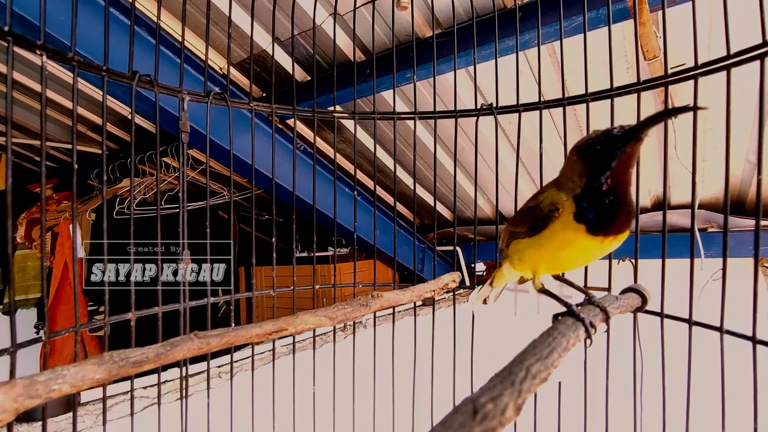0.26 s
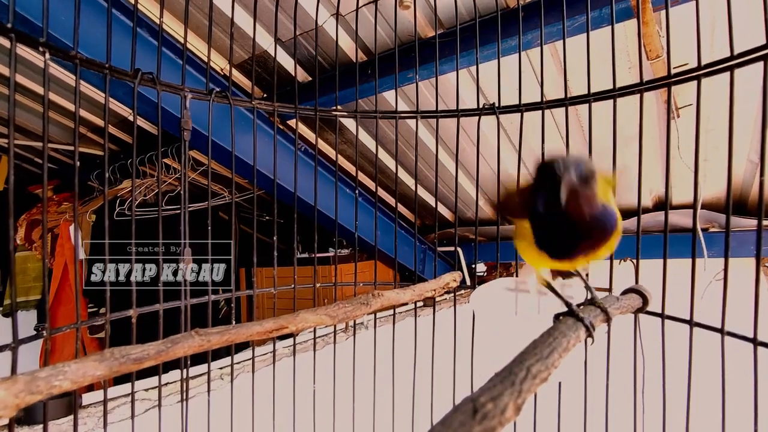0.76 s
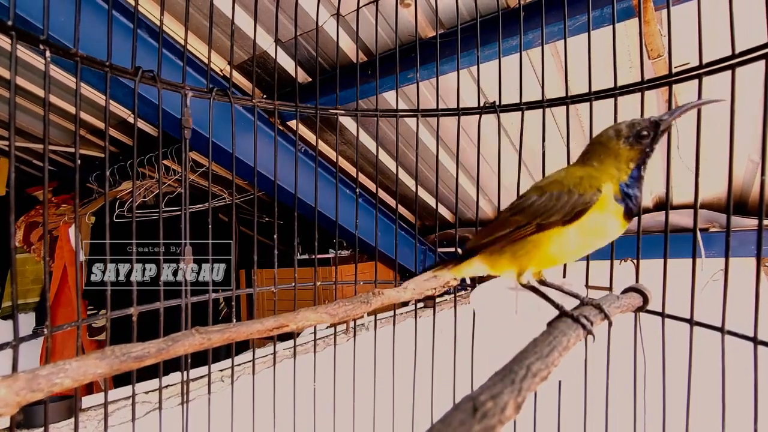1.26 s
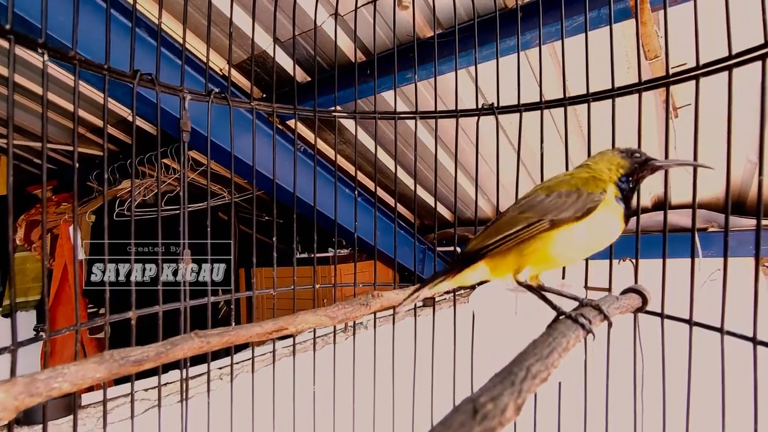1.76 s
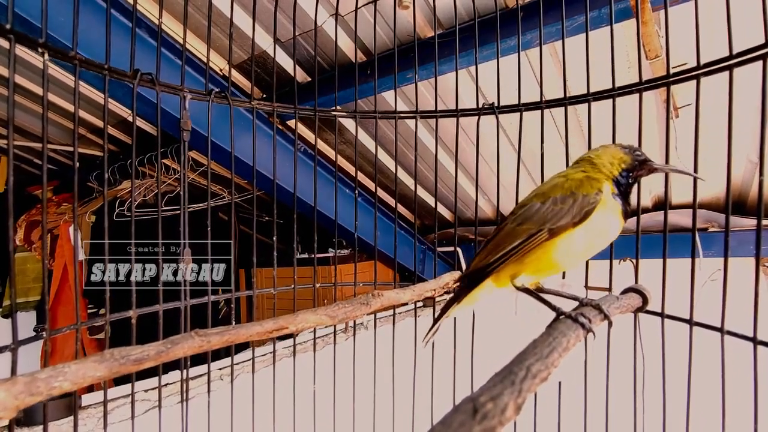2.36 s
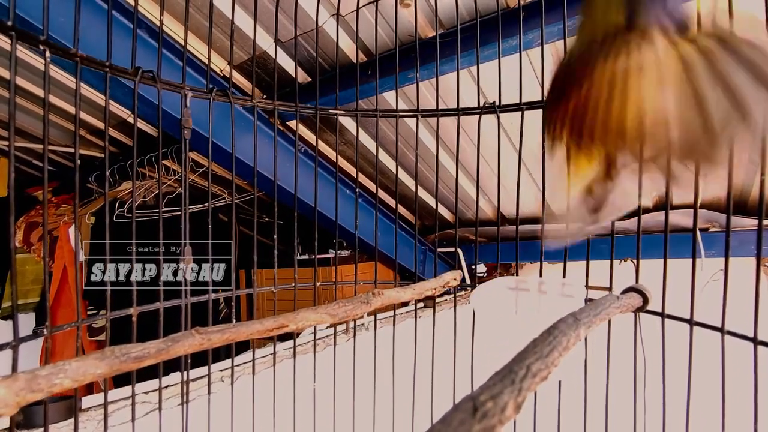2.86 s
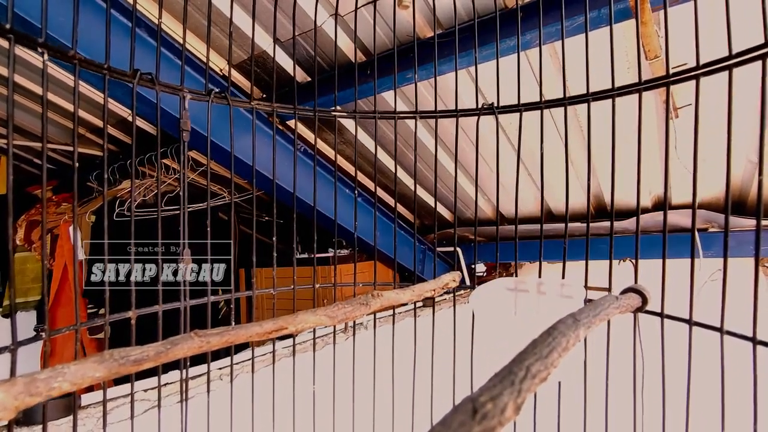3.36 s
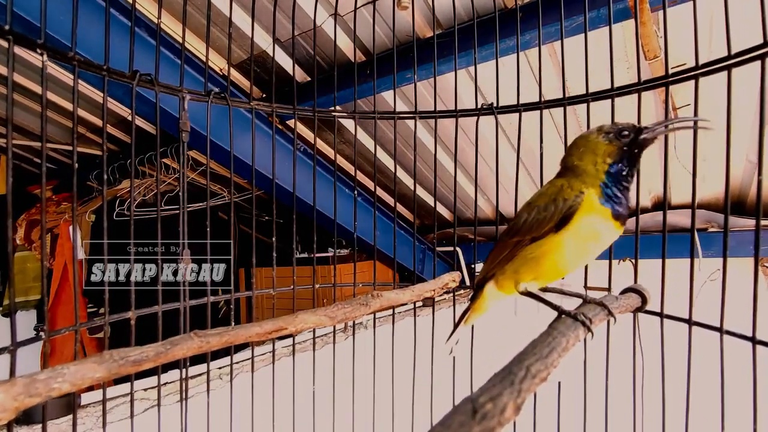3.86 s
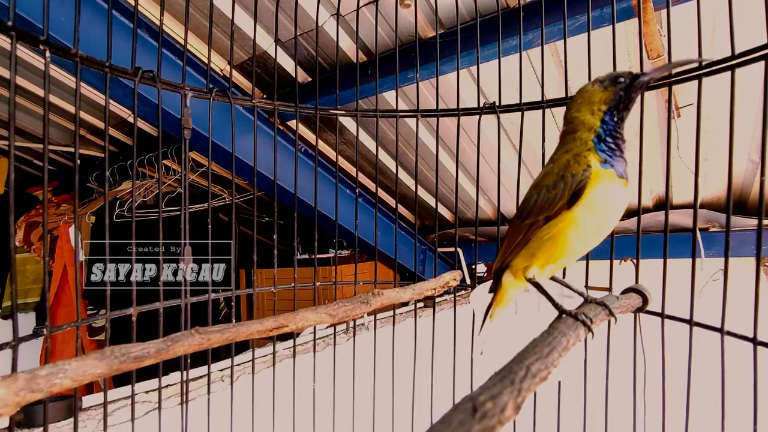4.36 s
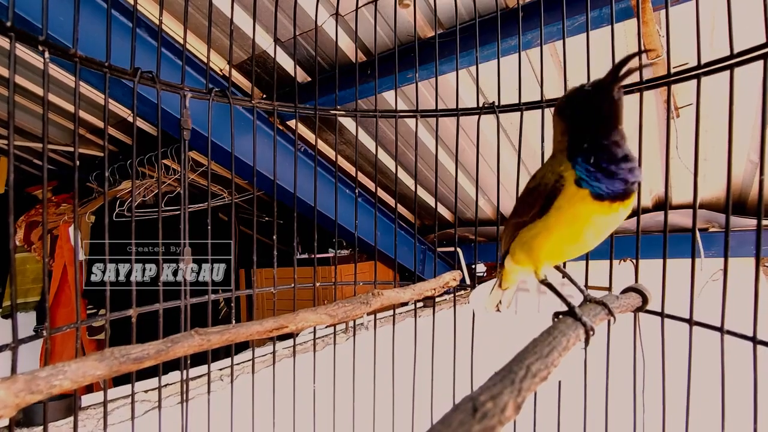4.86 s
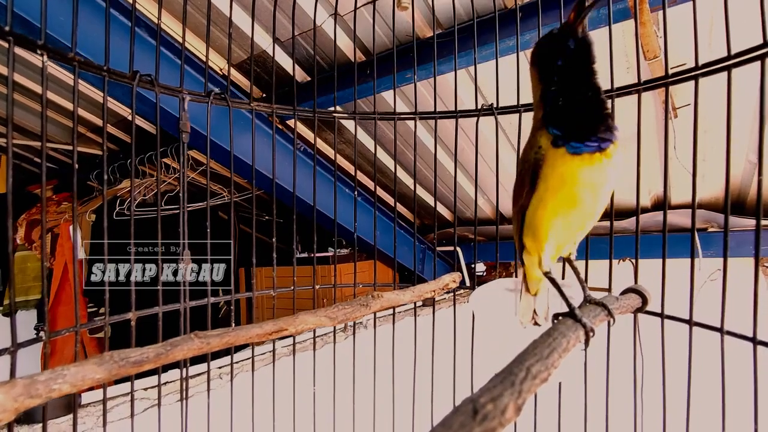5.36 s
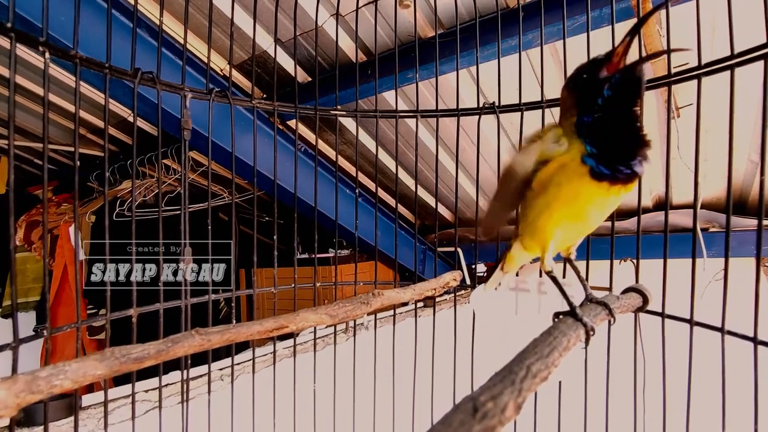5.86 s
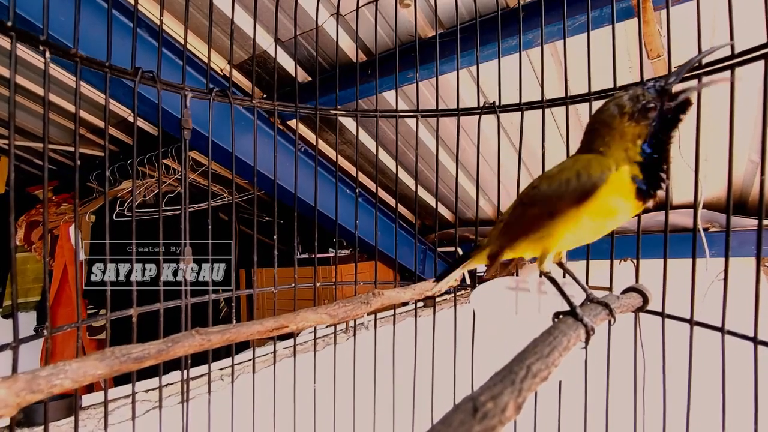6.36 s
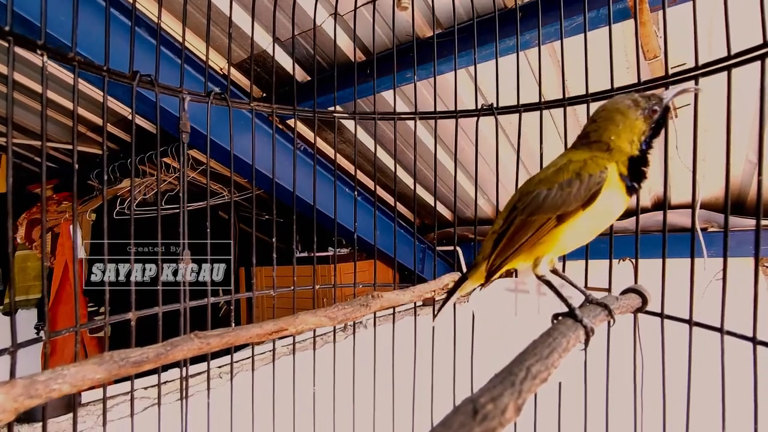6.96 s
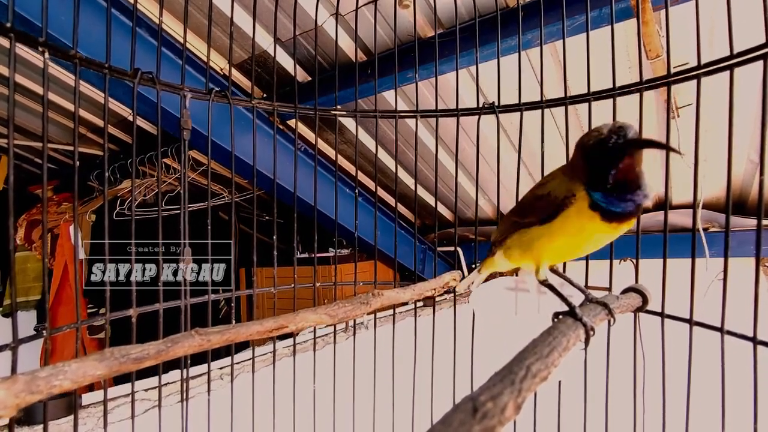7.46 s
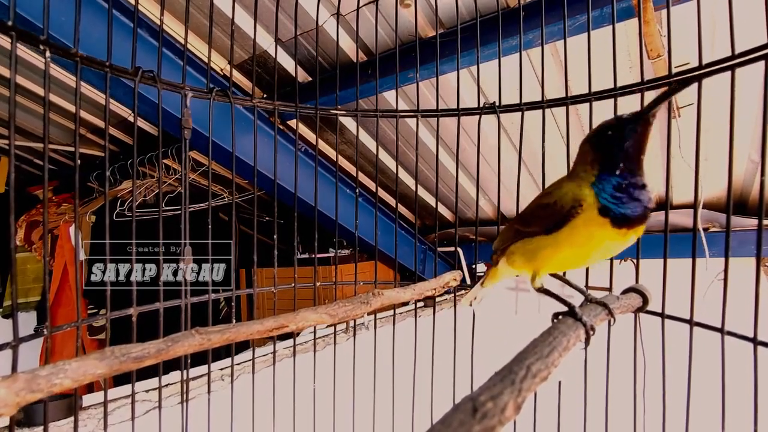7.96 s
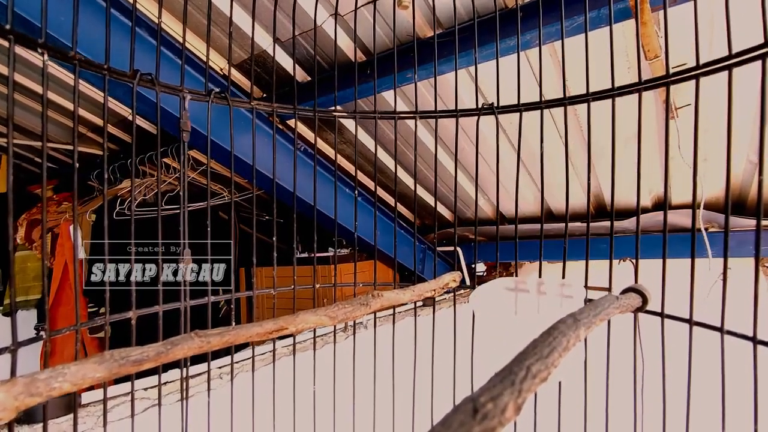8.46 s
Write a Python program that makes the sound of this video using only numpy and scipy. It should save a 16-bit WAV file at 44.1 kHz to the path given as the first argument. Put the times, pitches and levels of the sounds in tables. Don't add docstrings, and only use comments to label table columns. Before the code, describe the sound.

A small caged bird gives sharp chirps, then a fast bright song of falling whistles and rising trills over faint street hum and soft perch thumps.

```python
import sys
import numpy as np
from scipy import signal
from scipy.fft import rfft, irfft
from scipy.io import wavfile
from scipy.ndimage import uniform_filter1d, map_coordinates

SR = 44100
rng = np.random.default_rng(int(sys.argv[2]) if len(sys.argv) > 2 else 0)


def store_wav(level_fs):
    pcm = np.round(np.clip(np.atleast_2d(level_fs), -1, 1) * 32767)
    wavfile.write(sys.argv[1], SR, pcm.T.astype(np.int16))


def ratio(d):
    e = np.asarray(d, float) / 20
    return 10 ** e


N = 384552
FAR_LAG = 19.5
SCENE_CHANGE_S = 2.155


def rms_one(x):
    return x / np.sqrt(np.mean(x ** 2) + 1e-20)


def in_time(rows):
    s, *columns = np.transpose(rows)
    return [np.interp(np.arange(N) / SR, s, c) for c in columns]


def drift(rate):
    r = np.exp(-16 * np.pi * rate / SR)
    chance = rng.standard_normal((N + SR) // 8 + 2)
    slow = signal.lfilter([1], [1, -2 * r, r * r], chance)[SR // 8:]
    return np.interp(np.arange(N) / 8, np.arange(len(slow)), rms_one(slow))


FLICKER = 2.46 * drift(47)


def filtered(x, order, hz, kind="low"):
    return signal.sosfilt(signal.butter(order, hz, kind, fs=SR, output="sos"), x)


def coloured(spectrum, channels=1):
    hz, db = np.transpose(spectrum)
    bins = np.arange(N // 2 + 1) * SR / N + 1e-3
    colour = ratio(np.interp(np.log(bins), np.log(hz), db))
    return rms_one(irfft(rfft(rng.standard_normal((channels, N))) * colour, N))


def ports(x, lag):
    turn = np.exp(-2j * np.pi * np.arange(N // 2 + 1) / N * lag)
    return np.array([irfft(rfft(x) * turn, N), x])


def diffuse(spectrum, alike):
    shared = ports(coloured(spectrum)[0], FAR_LAG)
    return np.sqrt(alike) * shared + np.sqrt(1 - alike) * coloured(spectrum, channels=2)


def swells(rows, sharp):
    out = np.zeros(N)
    for s, length, db in rows:
        n, at = int(length * SR), int(s * SR)
        hump = ratio(db) * np.sin(np.pi * np.arange(n) / n) ** sharp
        out[at:at + n] += hump[:N - at]
    return out


def steady(lines, wander):
    out = np.zeros(N)
    for hz, db in lines:
        level = np.sqrt(2) * ratio(db + 2.9 * drift(2.3))
        out += level * np.sin(2 * np.pi * hz * np.cumsum(1 + wander * drift(1.52)) / SR)
    return out


def sing(out, start, hz, db, partials, order, fade):
    n, at = len(hz), int(start * SR)
    phase = 2 * np.pi * np.cumsum(hz / order) / SR
    edge = np.clip(np.minimum(np.arange(n), n - np.arange(n)) / (fade * SR), 0, 1)
    stack = np.zeros(n)
    for k, partial_db in enumerate(partials, 1):
        flicker_db = (k != order) * np.roll(FLICKER, 9000 * k)[at:at + n]
        audible = hz * k / order < 16000
        stack += ratio(partial_db + flicker_db) * audible * np.sin(k * phase + k * k)
    out[at:at + n] += np.sqrt(2) * ratio(db) * edge * stack


def whistles(notes, partials, order, gain_db):
    out = np.zeros(N)
    for note in notes:
        s, hz, db = np.transpose(note)
        t = np.arange(s[0], s[-1], 1 / SR)
        pitch = uniform_filter1d(np.interp(t, s, hz), size=90, mode="nearest")
        sing(out, s[0], pitch, gain_db + np.interp(t, s, db), partials, order, fade=.003)
    return out


def breathy(notes, flutter_db, rate, air_db, air):
    loudness = np.sqrt(uniform_filter1d(notes ** 2, size=200).clip(0))
    return notes * ratio(flutter_db * drift(rate)) + ratio(air_db) * loudness * air


# time in seconds, level in dB.
STREET = [(0, -47.5), (.7, -53), (2.153, -54), (2.157, -39.5), (2.5, -45), (3.3, -49), (4.5, -46),
          (5.9, -41), (6.6, -45.5), (7.9, -51.5), (8.1, -50), (8.45, -51.5), (8.55, -53.5), (8.72, -52)]
# frequency in Hz, density in dB per Hz.
RUMBLE = [(15, -68.5), (25, -38.5), (84, -11), (102, -5), (198, -7), (340, -8), (377, -11), (407, -8.5),
          (479, -11.5), (900, -23), (1170, -34), (1980, -120)]
# frequency in Hz, density in dB per Hz.
HISS = [(410, -35.5), (700, 2.5), (738, -1.5), (1140, -5.5), (1940, -11), (2880, -11), (5760, -21.5),
        (6570, -14.5), (7200, -27.5), (9110, -16.5), (10500, -21.5), (13000, -21.5), (16000, -38)]


def street():
    rumble_db, = in_time(STREET)
    hiss_db = -55.5 + 1.04 * (rumble_db + 48.5)
    rumble = ratio(rumble_db + 0.84 * drift(5.2)) * diffuse(RUMBLE, alike=0.98)
    return rumble + ratio(hiss_db) * diffuse(HISS, alike=0.04)


# pitch in Hz, level in dB.
HUM = [(113.0, -65.5), (188.4, -59.5), (263.8, -75), (339.1, -63.5)]
# pitch in Hz, level in dB.
FAN = [(414.6, -59.5), (214.5, -67.5), (94.4, -58)]


def hum():
    second = np.arange(N) > SCENE_CHANGE_S * SR
    return ports(np.where(second, steady(FAN, 0.0029), steady(HUM, 0.0024)), FAR_LAG)


# pitch in Hz, level in dB.
INSECTS = [(12800, -68.5), (12620, -77.5), (13300, -79)]


def insects():
    second = np.arange(N) > SCENE_CHANGE_S * SR
    line = ratio(-14 * second) * ratio(1.5 * drift(40)) * steady(INSECTS, 0.0015)
    return line * ratio(np.array([[0], [-9]]))


# start in seconds, length in seconds, first pitch in Hz, last pitch in Hz, level in dB.
FAR_BIRDS = [
    (0.0, 0.023, 2200, 3020, -61),
    (0.105, 0.035, 2095, 3160, -63),
    (0.192, 0.051, 1990, 3020, -64),
    (0.299, .035, 2030, 3450, -58.5),
    (0.422, .04, 2070, 3440, -57.5),
    (0.528, 0.033, 2050, 3170, -60.5),
    (0.965, 0.04, 2850, 2940, -70),
    (1.055, 0.03, 2500, 2410, -67),
]


def far_birds():
    calls, t = np.zeros(N), np.arange(SR // 2) / SR
    for s, length, first, last, db in FAR_BIRDS:
        hz = first + (last - first) * np.linspace(0, 1, int(length * SR)) ** 1.7
        overtone_db = -4 if s < .5 else -30
        sing(calls, s, hz, db, [0, overtone_db], order=1, fade=.006)
    calls = filtered(calls + 1e-18, 6, 4460)
    tail = rng.standard_normal(len(t)) * ratio(-60 * t / 0.54)
    echoes = signal.fftconvolve(calls, tail / np.sqrt(np.sum(tail ** 2)))[:N]
    return ratio(-7) * calls + echoes * ratio(7)


# start in seconds, length in seconds, level in dB.
RUSTLES = [
    (.63, 0.088, -60),
    (1.68, 0.11, -55),
    (2.17, 0.14, -55.5),
    (7.27, 0.095, -53),
    (7.392, .014, -50),
    (7.57, 0.077, -54),
    (7.95, 0.063, -60),
    (8.67, 0.039, -58.5),
]
# frequency in Hz, density in dB per Hz.
FEATHERS = [(1500, -17.5), (4000, -1.5), (7500, -4), (9000, 5.5), (13000, 2), (16000, -8.5)]


def rustles():
    return swells(RUSTLES, 0.49) * coloured(FEATHERS, channels=2)


# time in seconds, level in dB.
BIKE = [
    (2.2, -34),
    (4.0, -15),
    (4.6, -1),
    (6.9, -3),
    (7.4, -14),
    (8.4, -10.5),
]
EXHAUST = [-22.5, -16.5, -8, 1.5, 2, -6.5, -3, -6, -7.5, -8.5, -11, -9]
# frequency in Hz, density in dB per Hz.
TYRES = [(350, -22), (600, -3), (1580, -1.5), (2100, -9), (6690, -19.5), (7250, -26.5), (8990, -15.5),
         (10300, -29.5), (12100, -18), (15000, -47.5)]


def motorbike():
    firing_hz, speed_m_per_s, nearest_s, nearest_m = 45.27, 8.0, 5.9, 4.844
    open_db, = in_time(BIKE)
    along = speed_m_per_s * (np.arange(N) / SR - nearest_s)
    distance = np.hypot(along, nearest_m)
    spread_db = 20 * np.log10(nearest_m / distance)
    rate = firing_hz / (1 + speed_m_per_s * along / distance / 343)
    phase = 2 * np.pi * np.cumsum(rate * (1 + 0.00186 * drift(2.7))) / SR
    engine = np.zeros(N)
    for k, db in enumerate(EXHAUST, 1):
        engine += ratio(db + 4.4 * drift(2.6)) * np.sin(k * phase + k * k)
    engine = ratio(-35.5 + 0.71 * spread_db + open_db) * rms_one(engine)
    tyre_db = -38.5 + 1.674 * spread_db - along / distance
    return ports(engine, FAR_LAG) + ratio(tyre_db) * diffuse(TYRES, alike=0.27)


# time in seconds, level in dB, left minus right in dB, pitch factor.
THUMPS = [
    (2.2623, -27.5, -27, 0.783),
    (7.3412, -18, -29.5, 1.02),
]
# frequency in Hz, level in dB, t60 in seconds.
PERCH = [(112, -8, 0.14), (159.7, 0.5, 0.085), (212, 10, 0.037), (365, 14, 0.025), (523, 8.5, 0.029),
         (754, 4, 0.02)]


def thumps():
    out, t = np.zeros((2, N)), np.arange(SR // 4) / SR
    jolts = [(-.027, -17), (-.011, -10.5), (-.002, 9), (.003, -12.5), (.012, -13)]   # (offset s, dB)
    contact = 1 - np.exp(-t / 0.0036)
    for s, db, left_db, pitch in THUMPS:
        for lead, jolt_db in jolts:
            ring = np.zeros(len(t))
            for hz, mode_db, t60 in PERCH:
                struck_db = mode_db + rng.normal(0, 1.5)
                ring += ratio(struck_db - 60 * t / t60) * np.sin(2 * np.pi * hz * pitch * t)
            ring *= ratio(db + jolt_db + 3) * rng.choice([-1, 1]) * contact
            at = int((s + lead) * SR)
            out[:, at:at + len(t)] += ring * ratio(np.array([[left_db], [0]]))
    return filtered(out, 2, [70, 900], "band")


# time in seconds, pitch in Hz, level in dB.
CHIRPS = [
    [(2.275, 5340, -42.2), (2.2795, 4480, -31.7), (2.2835, 5900, -23.5), (2.285, 5990, -18.9),
     (2.2905, 5470, -16.8), (2.296, 6240, -11.1), (2.301, 6090, -14.0), (2.307, 6570, -20.3),
     (2.312, 6290, -26.4)],
    [(2.706, 3960, -37.9), (2.714, 3980, -25.0), (2.7195, 5400, -14.2), (2.724, 5020, -14.7),
     (2.7285, 5880, -15.8), (2.7355, 5250, -16.1), (2.7385, 6030, -21.1), (2.747, 5620, -20.9),
     (2.752, 5620, -23.7)],
    [(7.412, 4110, -54.2), (7.417, 4650, -38.8), (7.419, 5600, -33.9), (7.422, 5840, -25.3),
     (7.426, 5000, -22.0), (7.432, 7130, -19.6), (7.435, 6480, -19.5), (7.445, 6420, -18.4),
     (7.452, 6590, -30.6)],
]
CHIRP_OVERTONE_DB = [-15, -13, -6]
CHIRP_ECHO_DB = [-2, -4, 1]


def chirps(air):
    out = np.zeros(N)
    for note, db in zip(CHIRPS, CHIRP_OVERTONE_DB):
        out += whistles([note], [0, db, db - 20], order=1, gain_db=-0.8)
    out = breathy(out, 1.2, 170, -22, filtered(air, 4, 4300, "high"))
    starts = [note[0][0] for note in CHIRPS]
    echo_db = np.interp(np.arange(N) / SR, starts, CHIRP_ECHO_DB)
    return out, ratio(echo_db) * out


# start in seconds, length in seconds, level in dB.
RASPS = [(2.698, 0.039, -23), (3.034, 0.012, -40), (3.044, 0.069, -24), (3.411, 0.068, -27),
         (3.540, 0.065, -21.5), (3.436, 0.061, -25), (3.573, 0.06, -29), (3.852, 0.048, -23),
         (3.666, .014, -26), (4.122, 0.055, -23), (4.405, 0.055, -24), (4.730, 0.055, -27),
         (5.016, 0.048, -22), (5.323, 0.05, -19), (4.25, .05, -26), (4.3, .09, -20), (4.63, .06, -25),
         (4.524, .01, -26), (5.122, .014, -27)]


def rasps(air):
    return swells(RASPS, 0.36) * air


# time in seconds, pitch in Hz, level in dB.
GROWL = [
    [(3.05, 6500, -36), (3.062, 6150, -30), (3.072, 5700, -21), (3.084, 5250, -21), (3.09, 4300, -25),
     (3.1, 4150, -24), (3.112, 4000, -33)],
]
HOARSE = [-21, 0, -14, -12, -20]


def growl(air):
    return breathy(whistles(GROWL, HOARSE, order=2, gain_db=0), 3.5, 400, -6, air)


# start in seconds, length in seconds, first Hz, last Hz, level in dB.
SLURS = [
    (3.056, .05, 2850, 2730, -25),
    (3.413, 0.013, 4290, 4900, -31),
    (3.432, 0.0055, 3950, 4580, -29),
    (3.542, 0.013, 4770, 5950, -30),
    (5.509, 0.0037, 3920, 4510, -14),
    (4.228, .008, 5000, 7200, -24),
    (4.312, .03, 4300, 5600, -24),
    (4.345, .01, 5000, 6200, -24),
]
# start in seconds, length in seconds, first Hz, last Hz, level in dB.
RISES = [(3.441, .024, 4100, 7000, -14), (3.577, .019, 4500, 6600, -14), (3.856, .011, 5200, 6900, -15),
         (4.126, .012, 4600, 7000, -15), (4.409, .013, 4500, 7000, -13), (4.421, .005, 5600, 7000, -14),
         (4.733, .007, 5900, 7100, -18), (5.018, .017, 4800, 7000, -15), (5.327, .008, 5500, 7300, -15),
         (5.337, .006, 5600, 7000, -14)]
# start in seconds, length in seconds, top in Hz, level in dB.
HUMPS = [(3.466, .012, 6100, -14), (3.597, .011, 5700, -17), (3.867, .012, 5800, -15),
         (4.135, .014, 5200, -14), (4.425, .015, 4950, -14), (4.741, .03, 6750, -12),
         (5.035, .011, 5650, -18), (5.343, .011, 5600, -20)]
# start in seconds, length in seconds, first Hz, last Hz, level in dB.
FALLS = [(3.479, .012, 7000, 4500, -15), (3.609, .012, 6800, 4900, -14), (3.880, .015, 6900, 4200, -15),
         (4.148, .021, 6600, 3700, -13), (4.440, .023, 6600, 3900, -13), (5.047, .011, 6200, 4700, -17),
         (5.352, .013, 6500, 4600, -16)]
REEDY_SECOND = [-31, -3.5, -17, -20, -24, -24]


def rattles(air):
    strokes = []   # (s, length s, first, middle, last Hz, dB)
    for s, length, first, last, db in SLURS:
        strokes.append((s, length, first, (first + last) / 2, last, db))
    for s, length, first, last, db in RISES:
        strokes.append((s, length, first, (first + last) / 2 - .13 * (last - first), last, db + 2))
    for s, length, top, db in HUMPS:
        strokes.append((s, length, .82 * top, top, .8 * top, db))
    for s, length, first, last, db in FALLS:
        strokes.append((s, length, first, (first + last) / 2 - .06 * (first - last), last, db))
    out = np.zeros(N)
    for s, length, first, middle, last, db in strokes:
        u = np.linspace(-1, 1, int(length * SR))
        hz = middle + (last - first) / 2 * u + ((first + last) / 2 - middle) * u ** 2
        throat_db = 2.5 * (hz - 5800) / 1000
        sing(out, s, hz, db + throat_db, REEDY_SECOND, order=2, fade=.0025)
    return breathy(ratio(3.0) * out, 0.84, 150, -21, air)


# time in seconds, pitch in Hz, level in dB.
SWOOPS = [
    [(3.676, 5150, -24.2), (3.682, 5380, -9.7), (3.711, 5430, -9.3), (3.728, 4950, -9.1),
     (3.738, 4220, -12.9), (3.747, 3810, -21.8), (3.755, 3680, -25.4), (3.768, 3680, -27.2)],
    [(3.959, 4690, -28.1), (3.97, 5450, -8.9), (3.986, 5470, -12.4), (3.999, 5060, -10.8),
     (4.008, 4590, -10.2), (4.014, 4050, -15.2), (4.028, 3570, -30.7), (4.04, 3570, -27.3)],
    [(4.231, 4840, -28.0), (4.238, 5320, -9.4), (4.242, 5450, -8.5), (4.256, 5400, -10.7),
     (4.275, 5000, -23.0), (4.287, 4290, -16.3), (4.297, 3750, -20), (4.315, 3500, -25.4)],
    [(4.529, 4630, -24.6), (4.535, 5320, -10.9), (4.547, 5510, -9.3), (4.557, 5530, -7.9),
     (4.577, 5040, -10.5), (4.597, 4220, -13.2), (4.605, 3810, -21.5), (4.62, 3550, -33.0)],
    [(4.829, 4520, -23.7), (4.84, 5490, -9.3), (4.853, 5560, -9.3), (4.875, 5060, -8.6),
     (4.892, 4350, -9.6), (4.897, 4010, -13.8), (4.905, 3790, -20.1), (4.92, 3770, -33.7)],
    [(5.128, 4670, -25.7), (5.135, 4760, -16.8), (5.144, 5300, -8.5), (5.163, 5360, -9.1),
     (5.171, 5190, -8.7), (5.192, 4110, -13.4), (5.207, 3570, -25.7), (5.222, 3510, -32.9)],
    [(5.456, 4410, -27.4), (5.464, 5360, -10.2), (5.47, 5580, -8.5), (5.486, 5620, -9.1),
     (5.502, 5210, -8.3), (5.521, 4010, -13.1), (5.541, 3450, -31.1), (5.55, 3450, -30.5)],
]
ROUND = [-36, -1.5, -28, -24, -29, -31]


def swoops(air):
    return breathy(whistles(SWOOPS, ROUND, order=2, gain_db=1.0), 0.53, 90, -24, air)


# time in seconds, pitch in Hz, level in dB.
ARCHES = [
    [(3.752, 5620, -23.5), (3.761, 5510, -17.1), (3.785, 6440, -12.0), (3.797, 6520, -11.3),
     (3.804, 6890, -14.6), (3.811, 6930, -13.2), (3.82, 6550, -12.0), (3.83, 5940, -25.4)],
    [(4.022, 5560, -24.4), (4.03, 5340, -17.7), (4.047, 5680, -16.9), (4.056, 6400, -12.1),
     (4.082, 6800, -14.0), (4.091, 6350, -14.3), (4.097, 5250, -21.4), (4.1, 5250, -23.2)],
    [(4.296, 5430, -22.6), (4.315, 5060, -21.5), (4.333, 5840, -20.5), (4.342, 6890, -23.3),
     (4.353, 7130, -17.7), (4.375, 6590, -16.0), (4.377, 6050, -18.5), (4.385, 5320, -21.9)],
    [(4.612, 5490, -20.4), (4.626, 5730, -17.1), (4.649, 6720, -17.0), (4.659, 6550, -19.6),
     (4.663, 6890, -19.9), (4.67, 6220, -24.0), (4.675, 6570, -18.5), (4.69, 4840, -31.9)],
    [(4.912, 5380, -24.9), (4.918, 5530, -20.2), (4.936, 6440, -13.6), (4.954, 6590, -12.5),
     (4.965, 7040, -18.4), (4.977, 7130, -19.4), (4.987, 6290, -16.9), (4.993, 5390, -19.8)],
    [(5.204, 5510, -25.2), (5.213, 5230, -19.6), (5.226, 5340, -17.5), (5.249, 6480, -12.2),
     (5.267, 7040, -17.8), (5.281, 6720, -11.9), (5.29, 6160, -21.3), (5.298, 5260, -24.0)],
    [(5.53, 5300, -27.8), (5.549, 5280, -18.0), (5.569, 6310, -15.1), (5.587, 6870, -14.8),
     (5.592, 6800, -12.0), (5.607, 7000, -17.1), (5.615, 6590, -14.9), (5.625, 5690, -21.7)],
]
REEDY_THIRD = [-32, -18, -1, -14.5, -16.5, -21, -22]


def arches(air):
    return breathy(whistles(ARCHES, REEDY_THIRD, order=3, gain_db=1.5), 2.2, 220, -16, air)


# time in seconds, samples by which the left port hears later.
TURNS = [(2.3, -1.0), (2.7, -3.3), (3.1, -3.4), (3.45, -2.9), (3.7, -3.1), (3.88, -2.9), (3.99, -2.5),
         (4.06, -1.9), (4.15, -2.2), (4.26, -1.7), (4.44, -1.9), (4.57, -2.5), (4.63, -4.2), (4.96, -4.1),
         (5.04, -3.7), (5.35, -3.7), (5.6, -3.2), (7.4, -.5)]


def turning(x):
    lag, = in_time(TURNS)
    left = map_coordinates(x, [np.arange(N) - lag], order=5, mode="nearest")
    return np.array([left, x * ratio(1.1 * (lag + 3.2))])


def scattered(heard):
    share, edges, out = .6, np.geomspace(7500, 17000, num=5), heard
    shake = drift(130)
    for k in range(4):
        band_pass = signal.butter(2, edges[k:k + 2], "band", fs=SR, output="sos")
        band = signal.sosfiltfilt(band_pass, heard)
        own = np.array([np.roll(shake, 9000 * k), np.roll(shake, 9000 * k + 4500)])
        out = out + band * (np.sqrt(1 - share) + np.sqrt(share) * own - 1)
    return out


def shed(x):
    t = np.arange(SR // 2) / SR
    near_t60_s, tail_t60_s = 0.1, 0.72
    near, tail = rng.standard_normal((2, 2, len(t))) * (t > .0015)
    near = filtered(near * ratio(-28.5 - 60 * t / near_t60_s), 1, [4500, 14000], "band")
    tail = filtered(tail * ratio(-53 - 60 * t / tail_t60_s), 2, [5000, 8000], "band")
    return signal.fftconvolve(x[None], near + tail, axes=1)[:, :N]


# frequency in Hz, density in dB per Hz.
THROAT = [(710, -60), (1200, -35), (2510, -23), (2710, -26.5), (3180, -21), (4170, -12), (6100, -6),
          (8000, -20.5), (9010, -8.5), (9720, -16), (11700, -12), (13000, -20), (16000, -20)]
# frequency in Hz, width in Hz.
NOTCHES = [(7700, 900), (10300, 140)]


def bird():
    air = coloured(THROAT)[0]
    chirp, chirp_echo = chirps(air)
    song = rasps(air) + growl(air) + rattles(air) + swoops(air) + arches(air)
    heard = scattered(turning(song + chirp)) + shed(ratio(-3.5) * song + chirp_echo)
    for hz, width in NOTCHES:
        heard = signal.lfilter(*signal.iirnotch(hz, hz / width, SR), heard)
    return heard


def idling_vehicle():
    tones = steady([(99.5, 1), (151, -5.5)], 0.0039)
    return swells([(7.85, 0.64, -51.5)], .3) * tones


def scene():
    far = ports(far_birds() + idling_vehicle(), FAR_LAG)
    behind = street() + hum() + insects() + far + motorbike()
    return behind + rustles() + thumps() + bird()


def roll_off(x):
    return signal.sosfilt(signal.butter(12, 16630, fs=SR, output="sos"), x)


def record(dry):
    top = signal.sosfiltfilt(signal.butter(2, 10500, "high", fs=SR, output="sos"), dry)
    x = 1.252 * np.tanh((dry + top * np.array([[.2], [-.65]])) / 1.07)
    x = signal.sosfilt(signal.cheby2(14, 70, 16600, fs=SR, output="sos"), x)
    return roll_off(x)


dry = scene()
out = record(dry)
store_wav(out)
```